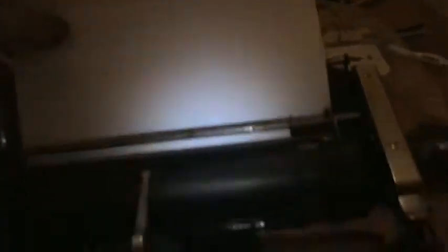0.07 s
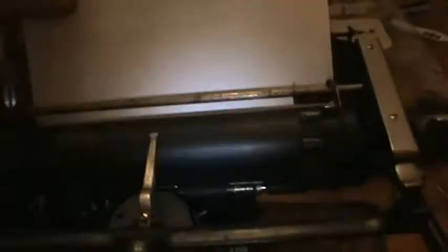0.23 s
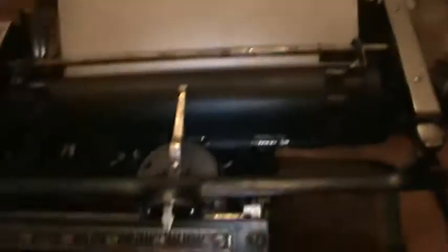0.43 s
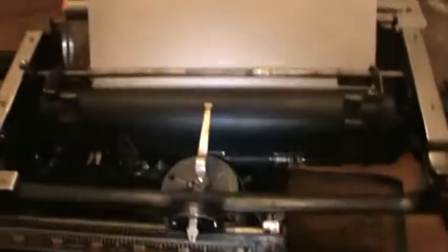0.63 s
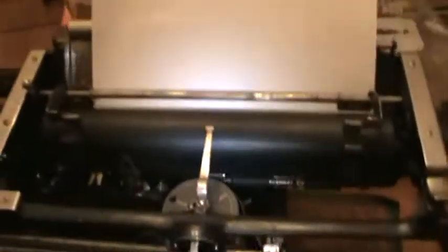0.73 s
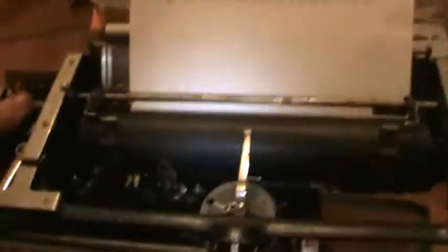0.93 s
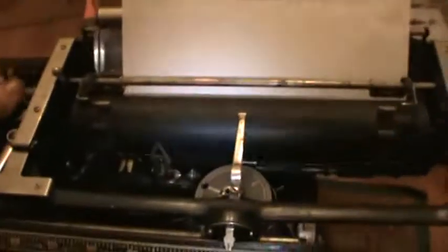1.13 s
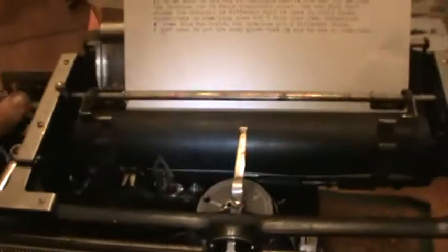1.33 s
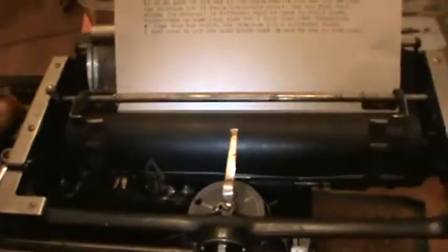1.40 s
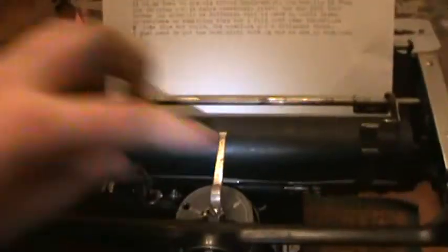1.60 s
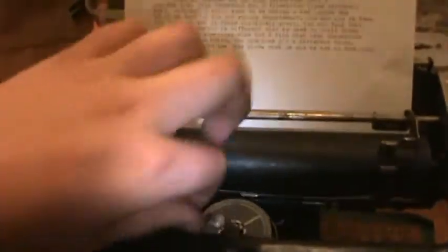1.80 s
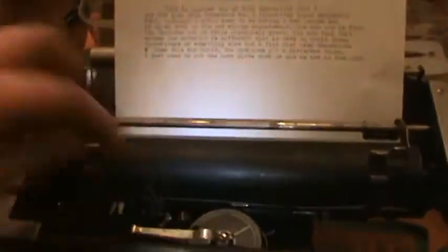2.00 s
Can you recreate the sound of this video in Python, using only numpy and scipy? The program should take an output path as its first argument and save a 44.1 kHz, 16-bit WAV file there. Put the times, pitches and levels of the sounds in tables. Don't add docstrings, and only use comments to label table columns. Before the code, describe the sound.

Old typewriter taking in a sheet, heard close on a small stereo camera microphone: crisp paper rustle, two short ratchet rattles with dull thumps, a pause, then one lever snap; quiet room, faint pulsing motor noise.

```python
import sys
import numpy as np
from scipy import signal
from scipy.fft import rfft, irfft, next_fast_len
from scipy.io import wavfile
from scipy.ndimage import uniform_filter1d, map_coordinates

SR = 44100
rng = np.random.default_rng(int(sys.argv[2]) if len(sys.argv) > 2 else 0)


def wav_out(sig):
    wavfile.write(sys.argv[1], SR, np.round(np.clip(np.atleast_2d(sig).T, -1, 1) * 32767).astype(np.int16))


def invert_db(level):
    return 10 ** (np.asarray(level, dtype=float) / 20)


N = 90449

BURST_LEN = SR // 10
LEAD_S = 0.00043
NEAR_SIDE_DB, HUSH_SIDE_DB = -15.5, -6
SCRAPE_GRAIN_DB = 1.8


def unit(x):
    return x / np.sqrt(np.mean(x ** 2) + 1e-20)


def along(points, hz):
    f, v = np.transpose(points)
    return np.interp(np.log(hz + 1), np.log(f + 1), v)


def curve(rows, order=1):
    rows = np.array(rows)
    return np.interp(np.arange(N) / SR, rows[:, 0], rows[:, order], left=-120, right=-120)


def wobble(rate):
    knots = rng.standard_normal(int(N * rate / SR) + 4)
    return map_coordinates(knots, [np.arange(N) * rate / SR])


def filtered(x, response):
    n = x.shape[-1]
    m = next_fast_len(n + 8192)
    return irfft(rfft(x, m) * response(np.fft.rfftfreq(m, 1 / SR)), m)[..., :n]


def peaks(table):
    def response(f):
        total = 0
        for k, (c, w, db) in enumerate(table):
            total = total + (-1) ** k * invert_db(db) * 1j * f * w / (c * c - f * f + 1j * f * w)
        return total
    return response


# pitch_hz [Hz], lead_rad [radians]
PORT_LEAD = [(100, 0.44), (480, 0.5), (1100, 0.34), (2300, -0.95), (3600, -0.24), (6500, 0.87),
             (8600, 0.88), (11500, 0)]


def spread(pair, side_db):
    side_top_hz = 13800
    side = invert_db(side_db) * filtered(pair[1], lambda f: f / (f + 150) / (1 + (f / side_top_hz) ** 8))
    side = side + filtered(pair[0], lambda f: 1j * np.tan(along(PORT_LEAD, f) / 2))
    return np.array([pair[0] + side, pair[0] - side])


def burst(t60):
    t = np.arange(BURST_LEN) / SR
    fall = invert_db(-60 * t / max(t60, .003))
    z = rng.standard_normal((2, len(t))) * fall * (1 - np.exp(-t / LEAD_S))
    return z / np.abs(z[0]).max()


def clicks(rows, air_db):
    out = np.zeros((2, N + SR))
    for s, db, hz, wide, t60 in rows:
        band = peaks([(hz, max(wide, .1) * hz, 0)])
        skirt = peaks([(hz, 2 * hz, air_db)])
        z = filtered(burst(t60), lambda f: band(f) ** 2 + skirt(f) ** 2)
        out[:, round(s * SR):][:, :BURST_LEN] += invert_db(db) * z / np.abs(z[0]).max()
    return spread(out[:, :N], NEAR_SIDE_DB)


# time_s [s], level_db [dB], treble_tilt [steps of 2 dB]
SLIDE = [
    (0, -31.5, -28),
    (.045, -35.5, 4.5),
    (.085, -41.5, 2.5),
    (.115, -34.5, 2),
    (.165, -42, 3),
    (.195, -41.5, 5),
    (.245, -33.5, -9),
    (.33, -37.5, -9),
    (.62, -60.5, 4),
]
# pitch_hz [Hz], level_db [dB per Hz]
PAPER = [(40, -19), (120, -4), (427, 2), (930, -5.5), (1460, -5.5), (2200, -13.5), (3240, -12),
         (13000, -29.5), (16000, -55)]


def sheet():
    grain = rng.standard_normal((2, N))
    grain = grain * invert_db(SCRAPE_GRAIN_DB * (wobble(199.9) + 0.59 * wobble(30.2)))
    rustle = unit(filtered(grain, lambda f: invert_db(along(PAPER, f))))
    bright = filtered(rustle, lambda f: f * f / (f * f + 2000 ** 2))
    tilt_db = np.minimum(curve(SLIDE, order=2), 6) * 2
    return spread(rustle - bright + bright * invert_db(tilt_db), NEAR_SIDE_DB) * invert_db(curve(SLIDE))


# start_s [s], peak_db [dB], pitch_hz [Hz], width [fraction of pitch], t60_s [s]
SNAPS = [(.002, -18.5, 800, 1.55, 0.046), (.0175, -9.5, 1320, 2.1, 0.012), (.018, -9.5, 380, 3.2, 0.01),
         (.036, -6, 4080, 0.76, 0.0051), (.089, -21.5, 1300, 4.1, 0.014), (.0362, -20, 1400, 0.27, 0.014),
         (.0364, -14, 3260, 0.17, 0.012), (.059, -28, 500, 0.69, 0.022), (.0962, -20, 240, 1.05, 0.0028),
         (.0964, -22, 1310, 0.96, 0.0039), (.0966, -23.5, 4000, 0.28, 0.0048),
         (.109, -24.5, 3100, 0.61, 0.15), (.123, -26.5, 450, 0.76, 0.012), (.145, -27, 513, .6, 0.035),
         (.180, -36, 8050, 0.78, 0.15), (.194, -25, 4200, 0.55, .05), (.295, -40, 12900, .2, .012),
         (.300, -45, 5200, 0.33, .01), (.1845, -17.5, 4200, 0.31, 0.013), (.185, -17.5, 1180, 1.3, 0.023),
         (.216, -24, 3100, 0.32, 0.026), (.230, -23.5, 700, 0.65, 0.074), (.234, -18, 1750, 0.67, 0.033),
         (.240, -20, 1300, 0.62, 0.091), (.248, -24, 3500, 0.33, 0.0059), (.280, -29.5, 4400, 0.58, 0.047),
         (.3377, -30, 4900, 0.22, 0.011), (.352, -36, 6000, 1.5, 0.0075), (.360, -33.5, 4420, 0.23, 0.0038),
         (.367, -37, 4730, 0.38, 0.029), (.377, -37, 5950, 1.4, 0.0072), (.433, -25.5, 4970, 0.38, 0.035),
         (.4332, -26.5, 11900, 0.28, 0.0027), (.4334, -31.5, 2360, 0.44, 0.017),
         (.5014, -36.5, 10300, 0.23, 0.0084), (.502, -33, 3630, 2.3, 0.036)]


def paper_snaps():
    return clicks(SNAPS, air_db=-12.5)


# pitch_hz [Hz], level_db [dB per Hz]
HUSH = [(12, -23), (25, 2), (111, 6.5), (347, 5.5), (1020, -8.5), (1550, -12), (1880, -9), (2480, -13.5),
        (15000, -18.5)]


def camera():
    hush_db, hush_sway_db = -53, .6
    motor_start_s, motor_period_s, motor_on_s = .0126, 1001 / 30000, 0.015
    motor_hz, motor_db, tick_db = 1907, -55.5, -40
    overtone_hz, overtone_db = 4770, -10.5
    line_hz, line_db = 15698, -71
    t = np.arange(N) / SR
    hiss = rng.standard_normal((2, N)) * invert_db(hush_sway_db * wobble(20.16))
    hush = unit(filtered(hiss, lambda f: invert_db(along(HUSH, f))))

    picture, since = np.divmod(t - motor_start_s, motor_period_s)
    pulse = (since < motor_on_s) * invert_db(-150 * since)
    gate = uniform_filter1d(pulse, size=100) * invert_db(2.7 * wobble(6.7))
    tick = (picture % 2 == 1) * invert_db(tick_db - 60 * since / 0.033) * rng.standard_normal(N)
    tick = filtered(tick, peaks([(2800, 250, 0.003)]))
    tone = np.sin(2 * np.pi * motor_hz * t + 0.39 * wobble(38.45))
    overtone = invert_db(overtone_db) * np.sin(2 * np.pi * overtone_hz * t)
    whine = invert_db(motor_db) * gate * (tone + overtone)
    line = invert_db(line_db + 2 + wobble(18)) * np.sin(2 * np.pi * line_hz * t)
    return invert_db(hush_db) * spread(hush, HUSH_SIDE_DB) + whine + tick + line


# start_s [s], peak_db [dB], t60_s [s], pitch_hz [Hz], thump_db [dB]
TEETH = [(0.765, -33.5, .03, 3950, -30), (0.7783, -23, .02, 4470, -38), (0.7824, -7.5, 0.022, 3100, -4),
         (0.7849, -19, 0.024, 5030, -13.5), (0.7996, -10.5, 0.0099, 4230, -3.5),
         (.8035, -8.5, 0.0078, 3000, -4), (0.8162, -3, 0.0042, 5400, -4),
         (0.8181, -15.5, 0.059, 1900, -6.5), (0.8342, -11, 0.056, 1560, -7),
         (0.8556, -10, 0.016, 4070, -9.5), (0.8929, -9.5, 0.018, 1520, -1.5),
         (1.1409, -7, 0.021, 4630, -8.5), (1.1448, -9, 0.02, 1470, -15), (1.1526, -8, 0.025, 3200, -9),
         (1.16, -11.5, 0.013, 4640, -19), (1.1684, -8.5, 0.02, 3230, -5.5), (1.2021, -9, 0.014, 3040, -6.5),
         (1.2079, -13.5, 0.016, 2600, -14), (1.229, -9, 0.012, 11300, -14),
         (1.2312, -11.5, 0.017, 3180, -4), (1.2338, -9, 0.023, 5840, -6.5), (1.2379, -20, 0.013, 4000, -20),
         (1.2496, -14, 0.018, 710, -12.5), (1.277, -11, 0.018, 2780, -3)]
# pitch_hz [Hz], level_db [dB per Hz]
TOOTH = [(290, -33), (500, -16), (1030, -12.5), (1570, -2.5), (3000, -6), (5710, -5), (6610, -7),
         (11500, -6.5), (16000, -19.5)]
# pitch_hz [Hz], width_hz [Hz], level_db [dB]
STEEL = [(1404, 160, -1.5), (1980, 17, -4), (2342, 18, 1), (3200, 91, 10.5), (4230, 60, 5),
         (4730, 61, 12.5), (5840, 105, 5.5), (7800, 130, -32), (11000, 200, -7), (12400, 89, -11)]
# pitch_hz [Hz], width_hz [Hz], level_db [dB]
FRAME = [(100.9, 8.5, 4.5), (296.7, 33, 2), (324, 20.7, 2.5), (407, 16.6, -0.5), (690, 105, -7)]
# start_s [s], level_db [dB]
KNOCKS = [
    (1.0, -8),
    (1.096, -12.5),
    (1.297, -12.5),
    (1.324, -12),
    (1.867, -12.5),
    (1.921, -21),
]
# start_s [s], level_db [dB]
LEANS = [(0.08, 15.5), (0.262, -7), (.34, -5), (0.45, 10), (0.518, 18), (0.545, 14), (1.038, 5),
         (1.149, 12.5), (1.337, 17), (1.412, 8)]


def ratchet():
    climb_db, climb_s = -12.5, 0.0069
    favour_db, favour_wide = 3, 0.28
    ring_db = -1
    thump_lift_db = 24
    hits, blows, leans = np.zeros((2, N + SR)), np.zeros(N), np.zeros(N)
    for s, db, t60, hz, thump_db in TEETH:
        start = round(s * SR)
        favour = peaks([(hz, favour_wide * hz, favour_db)])
        crack = filtered(burst(t60), lambda f: 1 + favour(f))
        climb = burst(7 * climb_s)[:, ::-1]
        hits[:, start:][:, :BURST_LEN] += invert_db(db) * crack / np.abs(crack[0]).max()
        hits[:, start - BURST_LEN:][:, :BURST_LEN] += invert_db(db + climb_db) * climb
        blows[start] = invert_db(thump_db + thump_lift_db)
    for s, db in KNOCKS:
        blows[round(s * SR)] += invert_db(db + 19.5)
    for s, db in LEANS:
        leans[round(s * SR)] = invert_db(db)

    steel, desk = peaks(STEEL), peaks(FRAME[:1])
    click = filtered(hits[:, :N], lambda f: invert_db(along(TOOTH, f) + 6.5) * (1 + invert_db(ring_db) * steel(f)))
    thump = filtered(blows, peaks(FRAME))
    lean = filtered(leans, lambda f: desk(f) / (1 + 1j * f / 120) ** 2)
    return spread(click, NEAR_SIDE_DB) + thump + lean


# time_s [s], level_db [dB]
FIRST_TWIST = [(.745, -53), (.775, -47), (.79, -30.5), (.85, -36), (.875, -37), (.90, -29), (.95, -79),
               (.99, -37.5), (1.04, -62)]
# time_s [s], level_db [dB]
SECOND_TWIST = [(1.118, -61), (1.125, -39.5), (1.14, -31.5), (1.17, -46), (1.185, -29.5), (1.22, -40),
                (1.27, -34), (1.30, -34.5), (1.39, -83)]
# pitch_hz [Hz], level_db [dB per Hz]
RUB = [(240, -15), (400, 2), (1030, -5.5), (2750, -4.5), (5270, -8), (5870, -12), (12100, -19),
       (16000, -36)]


def platen():
    grain = rng.standard_normal((2, N))
    grain = grain * invert_db(SCRAPE_GRAIN_DB * (wobble(300) + 1.6 * wobble(40.6)))
    steel = peaks(STEEL)
    scrape = unit(filtered(grain, lambda f: invert_db(along(RUB, f)) * (1 + invert_db(-26.0) * steel(f))))
    return spread(scrape, NEAR_SIDE_DB) * (invert_db(curve(FIRST_TWIST)) + invert_db(curve(SECOND_TWIST)))


# start_s [s], peak_db [dB], pitch_hz [Hz],
# width [fraction of pitch], t60_s [s]
TAPS = [(.981, -34.5, 3670, 0.73, 0.026), (.9812, -42, 9100, 0.32, 0.026), (.983, -45, 700, 1.7, 0.03),
        (1.0935, -46, 7500, 0.9, 0.015), (.999, -25, 2380, 1.8, 0.0087), (1.095, -31.5, 1100, 3, 0.053),
        (1.1415, -9, 10800, 0.38, 0.03), (1.618, -41.5, 787, 0.2, 0.024), (1.658, -34.5, 1310, 0.48, 0.015),
        (1.6582, -42, 3250, 0.16, 0.017), (1.709, -46, 3500, 1.1, 0.046), (1.728, -44, 2920, 0.55, .1),
        (1.737, -36.5, 3500, 3, 0.094), (1.741, -28, 2800, 0.5, 0.018), (1.746, -34.5, 2140, 0.78, 0.062),
        (1.738, -38, 7900, 0.33, 0.056), (1.742, -37, 780, 0.32, 0.093), (1.762, -50, 2900, 1.2, 0.032),
        (1.859, -34, 4700, 0.42, 0.023), (1.939, -37.5, 4200, 0.67, 0.044)]


def finger_taps():
    return clicks(TAPS, air_db=-14)


# pitch_hz [Hz], width_hz [Hz], level_db [dB]
LEVER = [(774, 140, -15), (2470, 170, -28), (3030, 240, 7), (4340, 300, 0.5), (5800, 270, -6),
         (6740, 500, -1), (9350, 980, -2), (11800, 430, 1.5), (13800, 1500, -7), (16200, 740, -1.5)]
# pitch_hz [Hz], width_hz [Hz], level_db [dB]
LEVER_RING = [(800, 120, -1.5), (1680, 150, 3), (2430, 130, 5.5), (3100, 220, 0), (4200, 300, -1),
              (5870, 170, 0), (6600, 200, -5), (9400, 200, -10), (11600, 180, -14)]


def lever():
    start_s, level_db, crack_t60 = 1.8645, -12, 0.0057
    bounce_s, bounce_db = .002, -3.5
    rattle_db, rattle_t60 = -12, 0.17
    struck, ringing = peaks(LEVER), peaks(LEVER_RING)
    crack = burst(crack_t60)
    bounce = np.roll(burst(crack_t60), round(bounce_s * SR), axis=1)
    crack = crack + invert_db(bounce_db) * bounce
    crack = filtered(crack, lambda f: struck(f) + invert_db(-14) * f / (f + 1500))
    rattle = filtered(burst(rattle_t60), lambda f: ringing(f) + invert_db(-9.5) * f / (f + 1500))
    crack = crack / np.abs(crack[0]).max()
    rattle = invert_db(rattle_db) * rattle / np.abs(rattle[0]).max()
    out = np.zeros((2, N + SR))
    out[:, round(start_s * SR):][:, :BURST_LEN] = crack + rattle
    return spread(invert_db(level_db) * out[:, :N], NEAR_SIDE_DB)


# pitch_hz [Hz], t60_s [s]
ROOM = [(200, 0.38), (2000, 0.29), (10000, 0.14)]


def room(x):
    hz, t, z = signal.stft(rng.standard_normal((2, SR // 2)), SR, nperseg=256)
    fall = invert_db(-60 * t / along(ROOM, hz)[:, None])
    tail = signal.istft(z * fall, SR, nperseg=256)[1]
    tail = tail / np.linalg.norm(tail[0])
    late = np.pad(x, (200, 0))
    late = filtered(late, lambda f: f * f / (f * f + 200 ** 2))
    return signal.fftconvolve(late[None], tail, axes=1)[:, :N]


def scene():
    near = ratchet() + platen() + sheet() + lever()
    near = near + paper_snaps() + finger_taps()
    room_db = -12
    return near + invert_db(room_db) * room(near.mean(axis=0)) + camera()


def band_limit(x):
    return signal.sosfilt(signal.butter(12, 16660, fs=SR, output="sos"), x)


def record(dry):
    top_hz = 15900
    mix = filtered(dry, lambda hz: hz < top_hz)
    return band_limit(mix)


dry = scene()
out = record(dry)
wav_out(out)
```